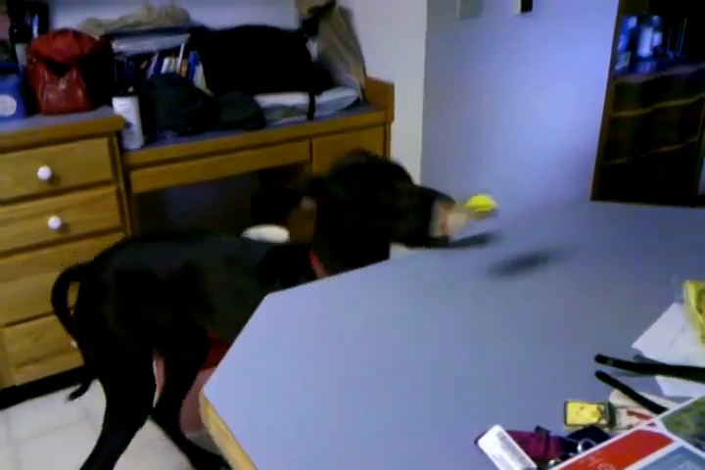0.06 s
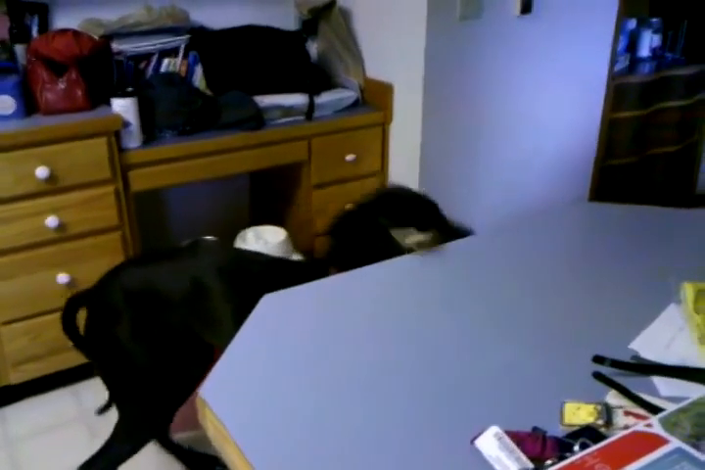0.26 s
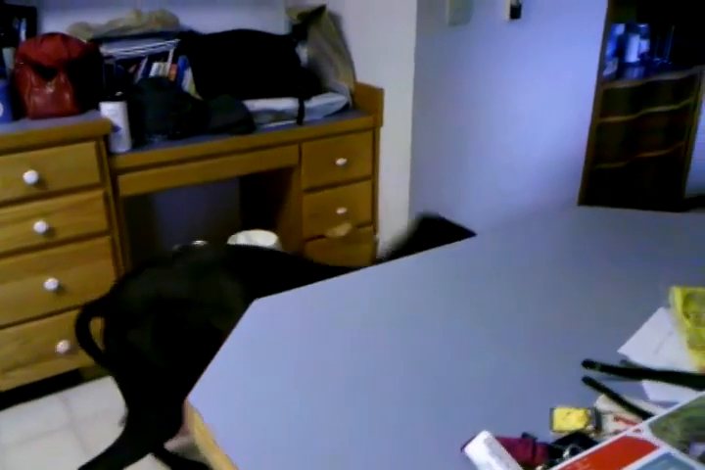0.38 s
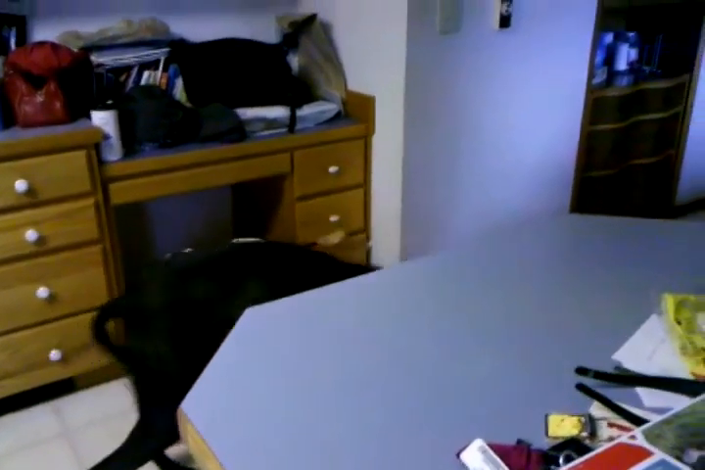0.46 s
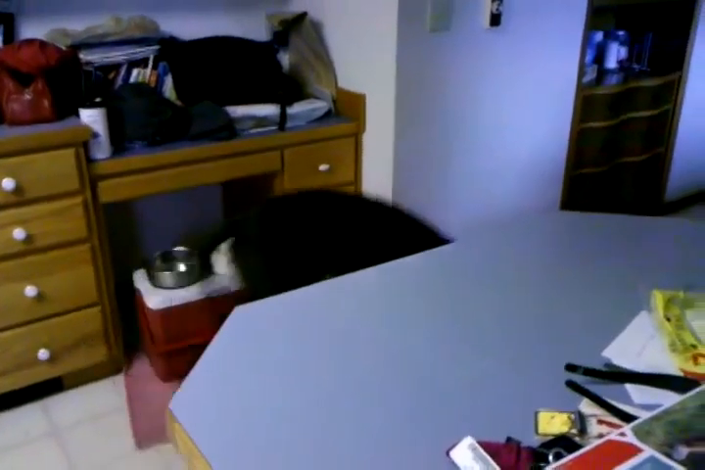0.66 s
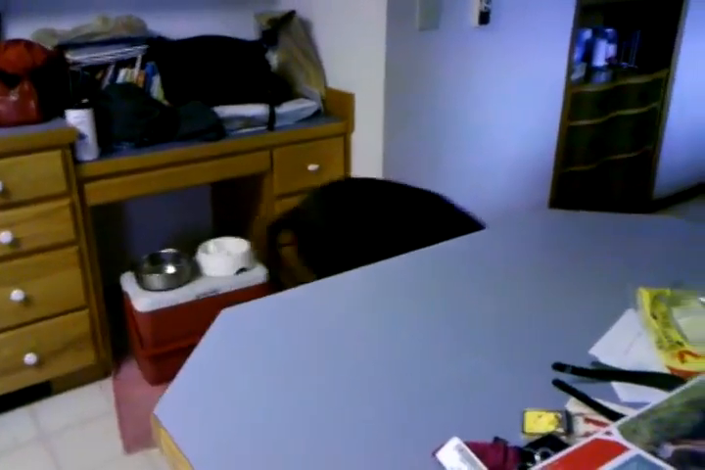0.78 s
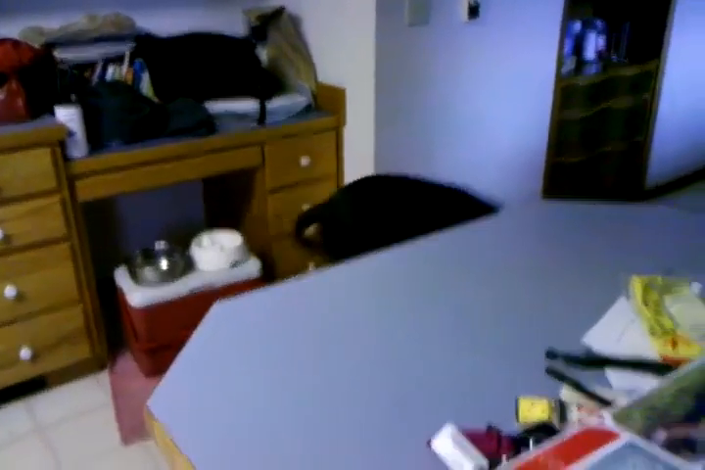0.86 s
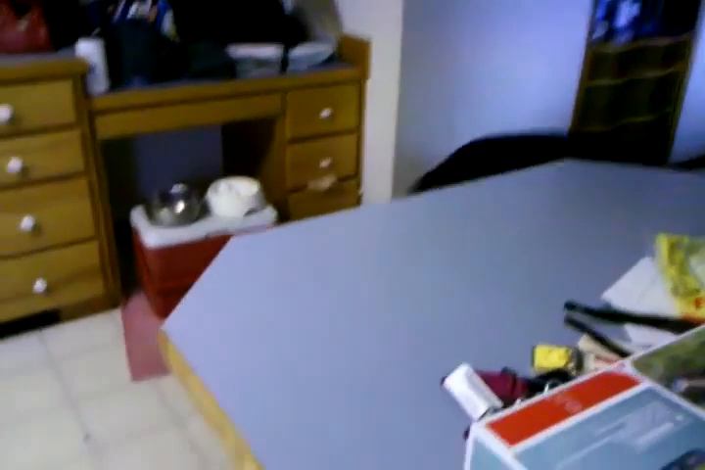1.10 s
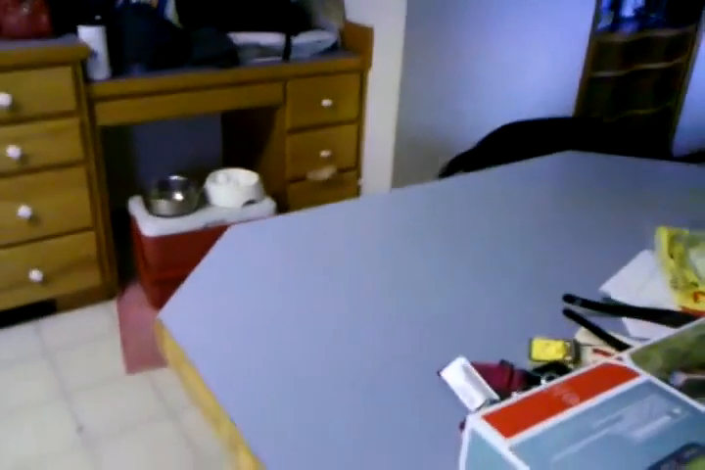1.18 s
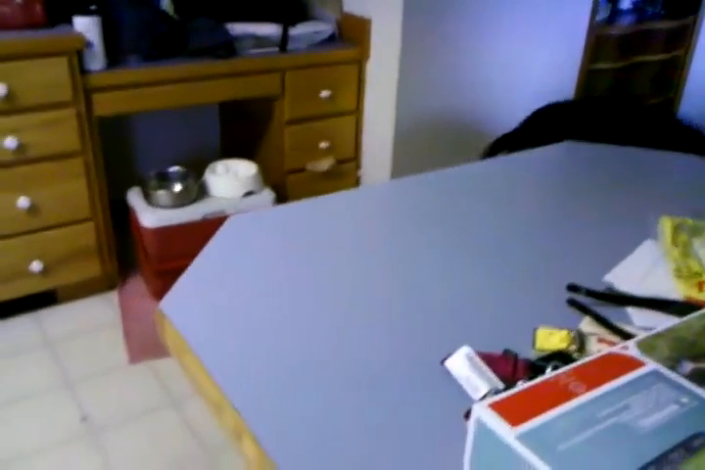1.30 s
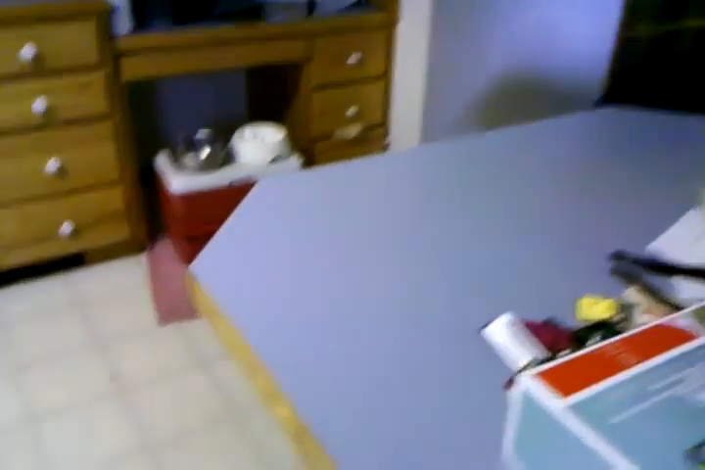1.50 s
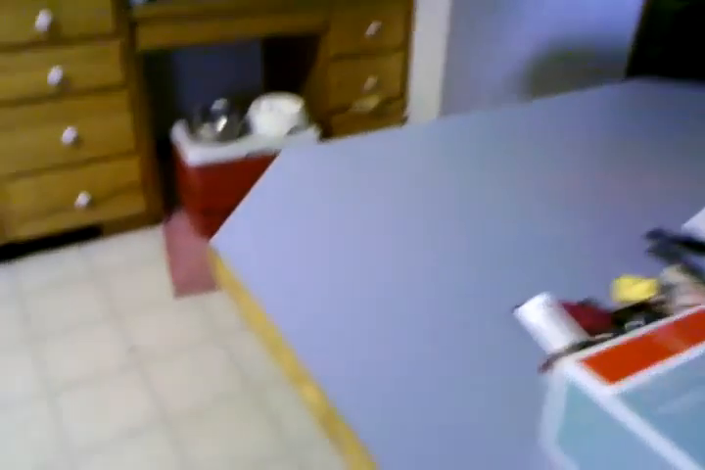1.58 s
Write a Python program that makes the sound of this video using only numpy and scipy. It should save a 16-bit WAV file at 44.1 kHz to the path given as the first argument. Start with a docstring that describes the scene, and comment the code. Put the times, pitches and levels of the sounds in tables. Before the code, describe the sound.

A mouse trap snaps at about 0.2 seconds, just after tiny ticks: a loud, close, slightly distorted crack with a table thump and a brief spring ring. Around 0.5 seconds it lands and bounces with wooden knocks and wire chinks. From 0.6 seconds a dog's paws scrape and thud softly on the floor, growing fainter through about 1.6 seconds, over low room hum.

```python
"""A mouse trap goes off on a kitchen table, close enough to overload a small microphone.
Over low room hum the catch slips with small ticks; the bar slams onto the wooden base,
the recoil thumps the table and the spring rings. The trap flies up, lands and bounces.
A startled dog scuffles away across the floor, paws scraping and thudding."""
import sys
import numpy as np
from scipy import signal
from scipy.fft import rfft, irfft, next_fast_len
from scipy.io import wavfile

SR = 44100
rng = np.random.default_rng(int(sys.argv[2]) if len(sys.argv) > 2 else 0)


def file_out(sig):
    """Save sig as 16-bit WAV at sys.argv[1]."""
    # one column per channel
    cols = np.atleast_2d(sig).T
    # limit, then scale
    lim = np.clip(cols, -1, 1)
    pcm = np.round(lim * 32767).astype(np.int16)
    wavfile.write(sys.argv[1], SR, pcm)


N = 72765
T = np.arange(N) / SR
ROOM_T60_S = 1


def amp(db):
    """Decibels to gain."""
    return 10 ** (np.asarray(db) / 20)


def rms_one(x):
    """Scale to rms 1."""
    return x / np.sqrt(np.mean(x ** 2) + 1e-20)


def colour(x, response):
    """Minimum-phase filter; response rows: f/Hz, gain/dB."""
    size = 2 * next_fast_len(N)
    hz, db = np.transpose(response)
    grid_hz = np.maximum(np.arange(size // 2 + 1) * SR / size, 1)
    gain = amp(np.interp(np.log(grid_hz), np.log(hz), db))
    cepstrum = irfft(np.log(gain))
    cepstrum[1:size // 2] *= 2  # fold onto the causal half
    cepstrum[size // 2 + 1:] = 0
    return irfft(rfft(x, size) * np.exp(rfft(cepstrum)))[:N]


def noise(spectrum):
    """Coloured noise, rms 1."""
    return rms_one(colour(rng.standard_normal(N), spectrum))


def clicks(hits):
    """One impulse per hit (t/s, level/dB)."""
    out = np.zeros(N)
    for t_s, db in hits:
        out[int(t_s * SR)] += amp(db)
    return out


def ring(hits, modes):
    """Each hit (t/s, level/dB) rings every mode (f/Hz, level/dB, T60/s) with random sign."""
    out = np.zeros(N)
    for t_s, hit_db in hits:
        start = int(t_s * SR)
        age_s = T[:N - start]
        for hz, mode_db, t60_s in modes:
            gain = rng.choice([-1, 1]) * amp(hit_db + mode_db)
            decay = np.exp(-np.log(1000) * age_s / t60_s)
            out[start:] += gain * decay * np.sin(2 * np.pi * hz * age_s)
    return out


def envelope(t_s, attack_s, hold_s, t60_s):
    """Linear rise, hold, exponential release."""
    rise = np.clip((T - t_s) / attack_s, 0, 1)
    released_s = np.maximum(T - t_s - attack_s - hold_s, 0)
    return rise * np.exp(-np.log(1000) * released_s / t60_s)


def reverb(x, wet_db, t60_s):
    """Direct sound plus a dense, uneven tail of dying reflections."""
    spacing_s, spread_db = 0.0012, 0.5
    strengths = amp(spread_db * rng.standard_normal(N))[(T / spacing_s).astype(int)]
    tail = rng.standard_normal(N) * strengths * envelope(0, attack_s=0.006, hold_s=0, t60_s=t60_s)
    return x + amp(wet_db) * signal.fftconvolve(x, tail / np.linalg.norm(tail))[:N]


def background():
    """Low room noise with a faint hum."""
    # room noise: f/Hz, relative level/dB
    spectrum = [(25, -11), (70, -19.5), (150, -2), (280, 1), (400, -1), (600, -12), (1200, -17.5),
                (2200, -27), (6500, -28), (8000, -35.5)]
    # hum tones: f/Hz, rms level/dB
    tones = [(156, -67.5), (210, -61), (263.8, -57), (314, -63)]
    hum = sum(amp(db) * np.sqrt(2) * np.sin(2 * np.pi * (hz * T + rng.random())) for hz, db in tones)
    return amp(-53) * noise(spectrum) + hum


def footfalls():
    """Paws thud dully through the floor."""
    # soft steps: t/s, level/dB
    steps = [(-0.01, -45), (0.255, -39), (0.706, -41), (1.039, -50.5), (1.23, -48)]
    # floor thud: f/Hz, relative level/dB
    spectrum = [(40, -36), (100, -11.5), (190, 2), (350, -2), (450, -6.5), (600, -9.5), (900, -20),
                (1500, -30), (5000, -54.5)]
    level = sum(amp(db) * envelope(t_s, attack_s=0.013, hold_s=0.025, t60_s=0.17) for t_s, db in steps)
    return noise(spectrum) * level


def scuffle():
    """Paws slide on the floor: dense friction grains swell and die with each scrape."""
    # scrapes: t/s, level/dB, attack/s, hold/s, T60/s
    scrapes = [(-0.02, -50.5, 0.0084, 0.0079, 0.14), (0.621, -32, 0.02, 0.0083, 0.17),
               (0.692, -38, 0.0094, 0.025, 0.27), (0.785, -37, .005, 0.051, 0.75),
               (0.911, -41, 0.016, 0.015, 1), (0.952, -35, 0.013, 0.0071, 0.25),
               (1.012, -43, 0.018, 0.059, .6), (1.234, -50, 0.016, .03, 0.51),
               (1.388, -60, .01, 0.036, 0.5), (1.503, -46.5, .002, 0.035, 0.44),
               (1.563, -46.5, 0.01, 0.06, .5)]
    # paw friction: f/Hz, relative level/dB
    spectrum = [(150, -38), (500, -10), (1100, -11), (1450, -1), (1700, -7), (1950, -8), (2200, -6.5),
                (2480, -0.5), (2950, -6.5), (3400, -4.5), (4100, -3.5), (4400, 1.5), (4700, -0.5),
                (5200, 4), (5750, -2), (6450, 5), (7600, -12.5)]
    grains_per_s = 2600
    grains = (rng.random(N) < grains_per_s / SR) * rng.choice([-1, 1], N)
    friction = rms_one(reverb(colour(grains, spectrum), wet_db=-5.5, t60_s=ROOM_T60_S))
    power = sum((amp(db) * envelope(t_s, *shape_s)) ** 2 for t_s, db, *shape_s in scrapes)
    return friction * np.sqrt(power)


def catch():
    """Small ticks as the catch slides off the trigger."""
    # slips: t/s, relative level/dB
    slips = [(0.1628, -14), (0.1682, -37), (0.1795, -22.5), (0.1845, -18.5), (0.1935, -4), (0.1981, 5.5),
             (0.2000, -7.5)]
    # catch on trigger: f/Hz, gain/dB
    response = [(100, -40), (800, 5), (1500, -10), (2700, -2), (4500, -6), (6000, -3.5), (7800, -2)]
    ticks = amp(1.5) * colour(clicks(slips), response)
    return reverb(ticks, wet_db=4.5, t60_s=0.17)


def landing():
    """Each bounce knocks the wooden base, chinks the loose wire and rings the table top."""
    # bounces, relative levels: t/s, knock/dB, wire/dB, table/dB
    bounces = [(0.4588, 0, -13, -6), (0.4655, -6, -10, -12), (0.5067, -2, -1, 0), (0.5240, -17, -5, -12),
               (0.5447, -6, -2, 0), (0.5505, -10, -5, -6)]
    # wood on table: f/Hz, gain/dB
    wood_response = [(60, -59.5), (170, -30), (340, -8), (500, -1), (900, 4.5), (1350, 2), (1900, -5.5),
                     (2300, -5), (3000, -15.5), (8000, -48)]
    # loose wire: f/Hz, gain/dB
    wire_response = [(100, -31), (1000, -26), (2400, -5), (3200, 0.5), (4000, 2), (5000, 4.5), (6600, 8),
                     (7800, -13.5)]
    # table top: f/Hz, level/dB, T60/s
    table_modes = [(163, -40.5, 0.32), (223.6, -45.5, 0.36), (271, -39.5, 0.45), (348, -27.5, 0.33),
                   (390.6, -29.5, 0.22), (558, -42, 0.31), (719, -37.5, 0.26), (862, -46.5, 0.088),
                   (1095, -32, .2)]
    wood_hits = [(t_s, db) for t_s, db, _, _ in bounces]
    wire_hits = [(t_s, db) for t_s, _, db, _ in bounces]
    table_hits = [(t_s, db) for t_s, _, _, db in bounces]
    knocks = amp(17.5) * colour(clicks(wood_hits), wood_response)
    knocks = reverb(knocks, wet_db=-3.5, t60_s=0.45)
    ticks = colour(clicks(wire_hits), wire_response)
    chinks = reverb(ticks, wet_db=-0.5, t60_s=0.038)  # the wire's own short ring
    low_cut = signal.butter(4, 160, "high", fs=SR, output="sos")
    table = signal.sosfilt(low_cut, ring(table_hits, table_modes))
    return knocks + reverb(chinks, wet_db=-3.5, t60_s=ROOM_T60_S) + table


def snap():
    """The bar cracks and chatters on the base; the recoil thumps the table; the spring rings."""
    # bar strike and rebounds: t/s, relative level/dB
    strikes = [(0.2038, 2.5), (0.2075, -9.5), (0.2150, -25), (0.2215, -21), (0.2545, -27.5)]
    # bar on wooden base: f/Hz, gain/dB
    crack_response = [(40, -50.5), (100, -29.5), (170, -20), (300, -16), (900, -22), (1600, -10.5),
                      (2500, -7), (2930, 4.5), (3400, -6.5), (4700, -4), (5600, 5), (6800, 2.5),
                      (7800, -10.5)]
    # bar chatter: f/Hz, relative level/dB
    chatter_spectrum = [(100, -31), (800, -15), (2500, 2), (4500, -4), (5700, 7.5), (7000, -1),
                        (7800, -7.5)]
    # recoil blows: t/s, relative level/dB
    recoils = [(0.2045, 2.5), (0.2105, -7)]
    # table under recoil: f/Hz, gain/dB
    thump_response = [(25, -16), (60, -25), (110, -4), (170, 7), (260, -1.5), (350, 1.5), (480, -23),
                      (880, 3.5), (1400, -21.5), (4000, -16.5)]
    # spring and wire: f/Hz, relative level/dB
    spring_modes = [(2861, -1), (2889, 1), (2927, -1), (2976, -1), (4999, -5), (5162, -2), (5251, -4),
                    (5343, -1), (5557, 0), (5639, -2), (5726, 0), (5755, -2), (5874, -1), (6077, -4),
                    (6231, -3), (6295, -1), (6470, -3), (6577, 0), (6735, 1), (6943, -2), (7116, -4)]
    spring_db, spring_t60_s = -20, 0.56
    crack = amp(24.5) * colour(clicks(strikes), crack_response)
    chatter_decay = envelope(strikes[0][0], attack_s=1 / SR, hold_s=0, t60_s=0.13)
    chatter = amp(-5) * noise(chatter_spectrum) * chatter_decay
    thump = amp(20.5) * colour(clicks(recoils), thump_response)
    spring = ring(strikes[:1], [(hz, spring_db + db, spring_t60_s) for hz, db in spring_modes])
    return reverb(crack, wet_db=7, t60_s=0.45) + chatter + thump + spring


def scene():
    """Trap, dog and room at one microphone."""
    return (catch() + snap() + landing() + scuffle() + footfalls() + background())[None]


def record(dry):
    """Soft input overload, band limit, hard clip of the remaining peaks, final low-pass."""
    bandwidth_hz, cutoff_hz, full_scale = 7400, 16800, 0.87
    narrow = signal.sosfilt(signal.butter(30, bandwidth_hz, fs=SR, output="sos"), np.tanh(dry))
    clipped = np.clip(narrow, -full_scale, full_scale)
    return signal.sosfilt(signal.butter(16, cutoff_hz, fs=SR, output="sos"), clipped)


dry = scene()
out = record(dry)
file_out(out)
```